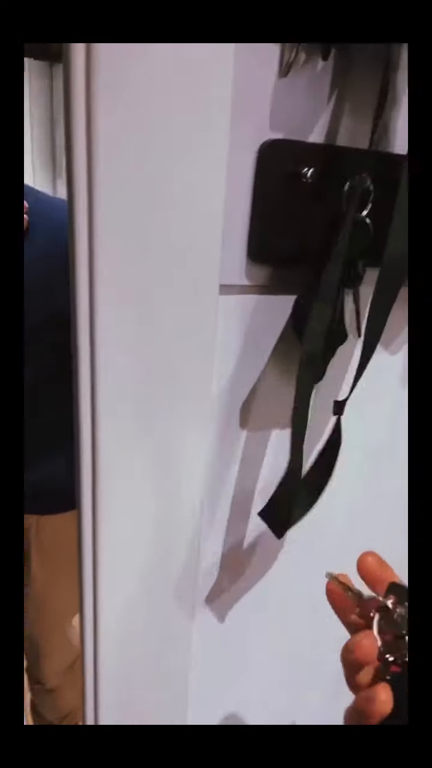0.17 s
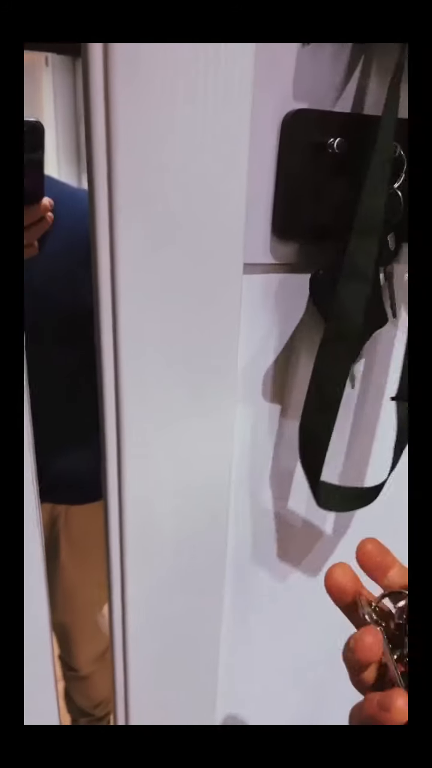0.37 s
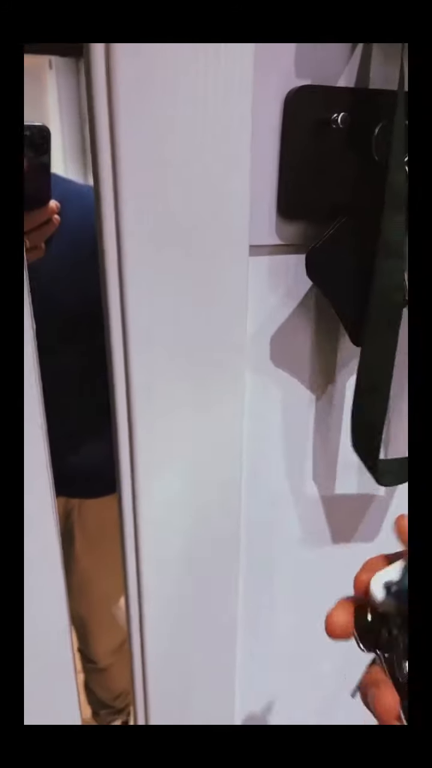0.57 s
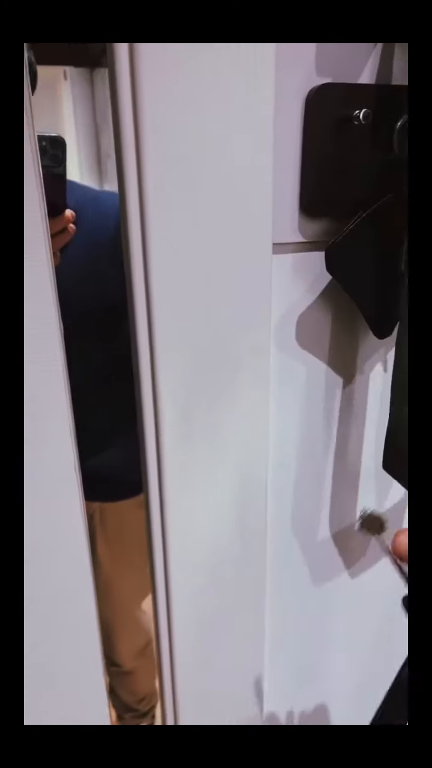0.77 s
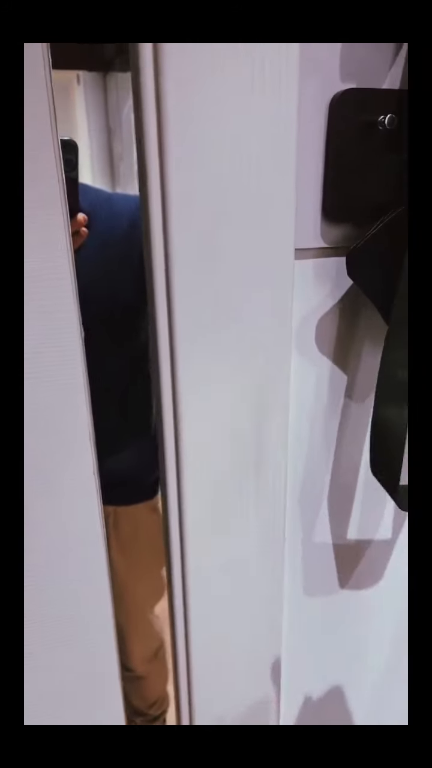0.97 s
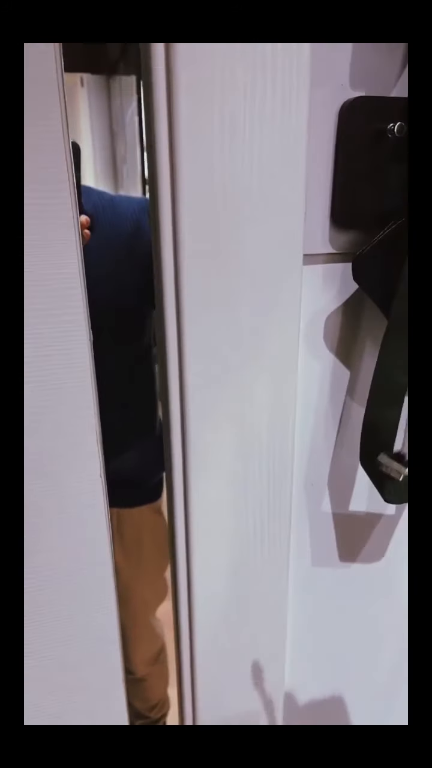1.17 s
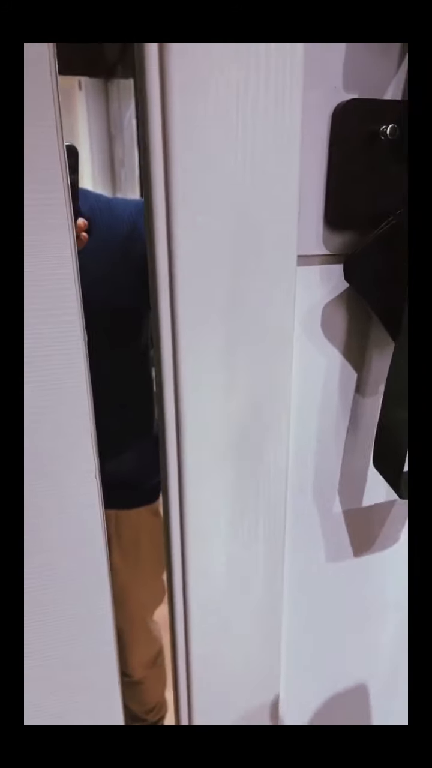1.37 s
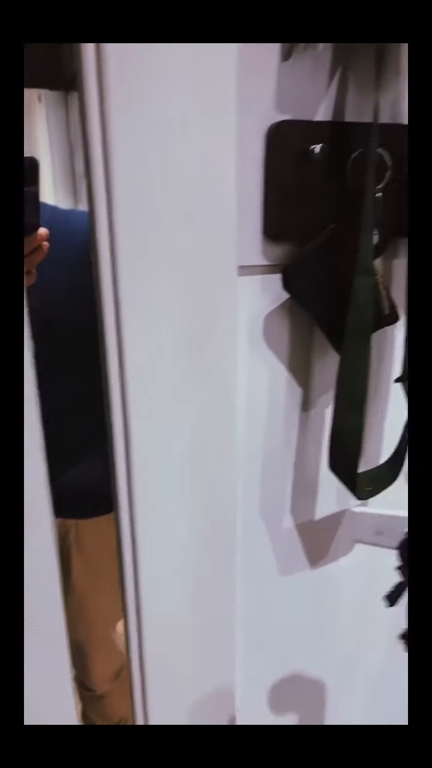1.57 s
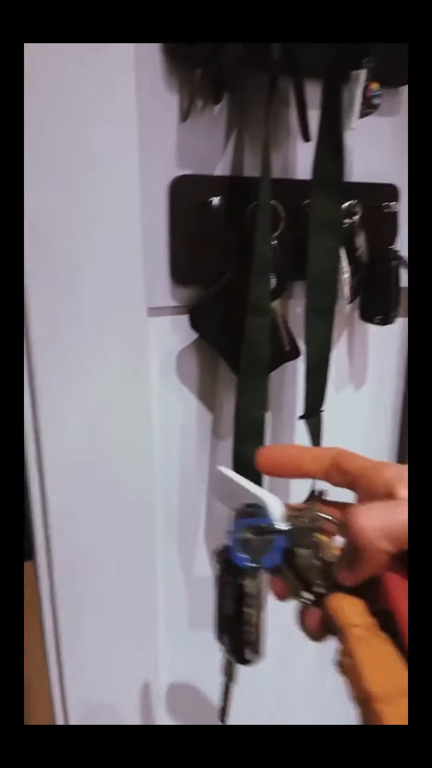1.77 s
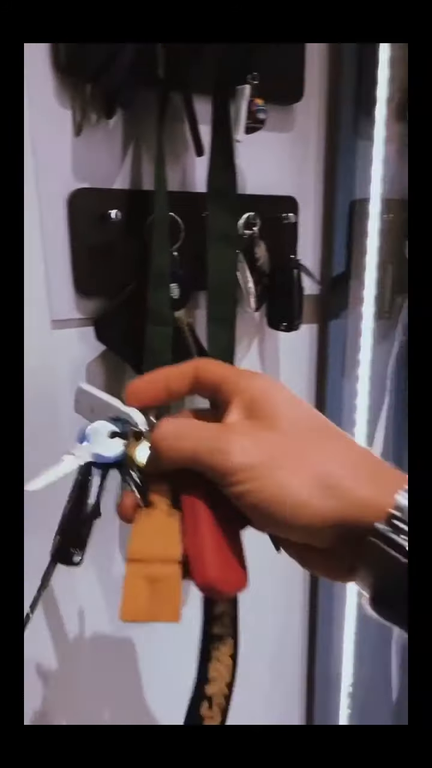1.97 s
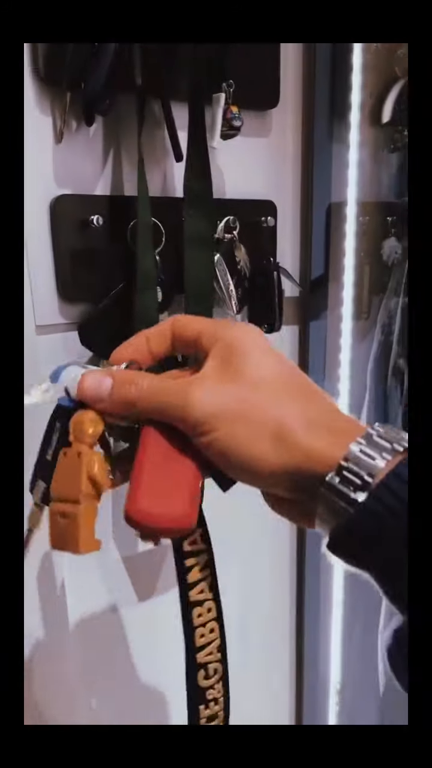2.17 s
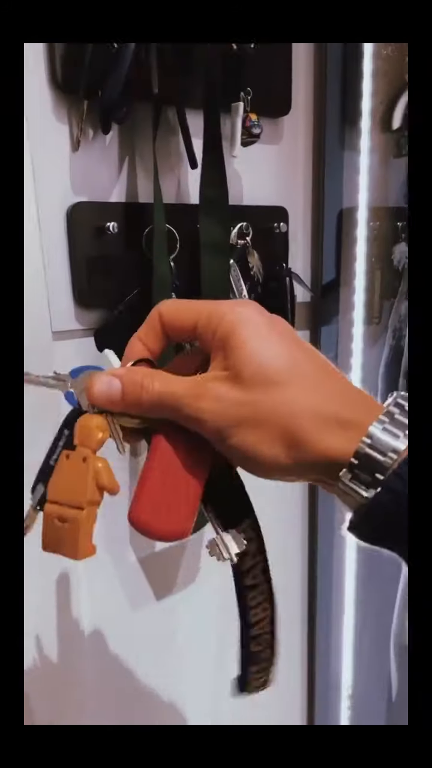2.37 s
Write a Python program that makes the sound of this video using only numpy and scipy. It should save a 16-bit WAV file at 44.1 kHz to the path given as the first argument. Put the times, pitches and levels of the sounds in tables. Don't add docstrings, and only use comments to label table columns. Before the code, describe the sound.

A bunch of keys and plastic fobs is handled close up, in dry, finger-muffled clacks and fine metallic rattle. Brisk clinks with short high rings come before 0.5 s, with sharper clacks near 0.7 and 0.84 s. From 1 to 1.7 s it is softer ticking. Wall knocks and faint low thuds join around 1.75-1.95 s, then the loudest clatter at 2.1-2.2 s and a last clack near 2.4 s. Quiet room air, faint hum, short echo.

```python
import sys
import numpy as np
from scipy import signal
from scipy.fft import rfft, irfft
from scipy.io import wavfile

SR = 44100
rng = np.random.default_rng(int(sys.argv[2]) if len(sys.argv) > 2 else 0)


def gain_from_db(level_db):
    decades = np.asarray(level_db, float) / 20
    return 10 ** decades


def persist_wave(psi):
    counts = np.round(np.clip(psi, -1, 1) * 32767).astype(np.int16)
    wavfile.write(sys.argv[1], SR, np.atleast_2d(counts).T)


N = 106016

# (time [s], level [dB])
HUM_SWELL = [
    (0, -76),
    (1.1, -62.5),
    (1.55, -60.5),
    (1.68, -54),
    (2.4, -56.5),
]
# (frequency [Hz], level per Hz [dB])
AIR_TONE = [(55, 4), (120, -7), (165, 0), (210, -11), (480, -12.5), (750, -17.5), (2300, -18),
            (4000, -28.5), (14000, -51)]
HUM_HZ, AIR_DB = 60, -62

# (time [s], rustle level [dB])
HANDLING = [(0, -48.5), (.17, -53), (.5, -57), (.6, -76), (.72, -59), (1.0, -68), (1.25, -67), (1.6, -64.5),
            (2.15, -54.5), (2.26, -60.5), (2.4, -55.5)]
# (frequency [Hz], level per Hz [dB])
BUNCH_TONE = [(710, -56), (1200, -13.5), (2290, -6), (3250, -10.5), (3720, -9), (4660, -12.5),
              (9570, -16.5), (14000, -17)]
RATTLE_S = 0.011
GRAINS_PER_S, GRAIN_SPREAD_DB = 10000, 2.4
GRAIN_CYCLES, SHIMMER_S = 30.0, .009

# the first four from one key, the last two from two other keys (frequency [Hz])
KEY_HZ = [6100, 10110, 10740, 13850, 11285, 13290]
# (time [s], level [dB], time to fall 60 dB [s])
KEY_HITS = [
    [(.335, -47.5, 0.71), (.45, -41.5, 0.45), (.482, -45, 0.027)],
    [(.335, -48, 0.75), (.482, -42, 0.088)],
    [(.45, -45, 0.27)],
    [(.285, -30, 0.14), (.445, -39, .2), (.482, -22.5, 0.027)],
    [(.001, -42, 0.2), (.436, -41, .15), (.924, -37.5, 0.073), (2.22, -48, .05)],
    [(.198, -42, 0.068), (.235, -41, 0.12), (1.938, -39, 0.24), (2.301, -46.5, 0.19)],
]
TAG_HZ = [6950, 7870, 10860, 12425, 2340, 8850]
# (time [s], level [dB], time to fall 60 dB [s])
TAG_HITS = [
    [(.595, -47.5, 0.094), (.567, -50, 0.058), (.925, -45, 0.072), (1.198, -34, 0.083), (1.613, -42, 0.17),
     (2.208, -44, 0.074)],
    [(.545, -45, .06), (.595, -51, 0.081)],
    [(0.546, -40, 0.078), (.595, -53, .06), (1.882, -58, 0.081)],
    [(.595, -57, 0.15), (1.198, -42, 0.15), (1.882, -39, 0.038)],
    [(.565, -35.5, 0.028), (.595, -42, 0.049)],
    [(2.169, -35.5, 0.082), (2.302, -32, 0.019)],
]
STRIKE_S, STOP_S = .0015, .05

# (time [s], peak level [dB], body pitch [Hz], brightness [dB], after-rattle level [dB])
CLACKS_LOW = [(.003,-37,2290,-5,-14.5),(.0448,-40,2380,0,-24),(.073,-32,2240,-6,-19),(.114,-34.5,4230,-3,-8.5),(.1379,-42,2700,4.5,-8),
              (.197,-45,3030,2,-17),(.2052,-27,2540,-11.5,-15.5),(.2314,-46.5,2120,9,-7),(.2854,-36,2520,1.5,-7),
              (.3296,-28.5,4270,-3,-9),(.3635,-41,1570,-2,-6),(.4229,-25,3210,-2.5,-11.5),(.4314,-27.5,2570,-3.5,-11.5),(.4818,-44,3370,4,-14),
              (.5232,-43.5,1520,-15,-2.5),(.5367,-44.5,2650,-6,-7),(.5457,-44,2340,1.5,-8.5),(.5516,-44.5,3850,-2,-8),(.5604,-41.5,2370,1,-8.5),
              (.6624,-44,2060,0,-6),(.672,-45,2190,-14,-16),(.6809,-23,1875,-5,-14.5),(.688,-31,1890,-18,-13),(.6958,-39,1880,-15,-18),
              (.72,-44,2680,4.5,-10),(.7625,-32.5,1700,-16,-9.5),(.7794,-40,2080,-17,-18),(.7963,-34,2280,-9,-12.5),(.839,-19.5,2340,-7,-15.5),
              (.8562,-34.5,1860,-10,-8),(.8752,-37.5,2300,3.5,-8),(.906,-45,1530,5,-9),(.9222,-36.5,1730,2.5,-9)]
# (time [s], peak level [dB], body pitch [Hz], brightness [dB], after-rattle level [dB])
CLACKS_TURN = [(.971,-44,2300,-8,-17),(.9906,-43.5,1790,-25,-25),(1.1109,-36.5,2300,-11,-12),
               (1.1185,-38.5,2130,-9,-11.5),(1.134,-58,2260,-22,-28),(1.153,-46,3000,2,-18),(1.158,-33,2350,-11.5,-10.5),(1.199,-34,2680,-6,-7.5),
               (1.2261,-35.5,2260,-6.5,-6.5),(1.2435,-32,2440,-18,-7.5),(1.253,-35,1990,-3,-8.5),(1.2888,-36,1930,-31,-8.5),(1.3066,-34.5,1520,-4.5,-11),
               (1.3295,-40,2260,-12,-16),(1.3722,-35.5,3600,-32,-10),(1.3888,-42.5,3500,5.5,-10),(1.3973,-36,2280,-32,-14),(1.4183,-39,2640,-0.5,-8.5),
               (1.4612,-40,2050,-7.5,-6),(1.4895,-37.5,2260,-1,-10),(1.507,-38.5,1960,-35,-8),(1.5233,-32.5,2720,-32,-11),(1.5357,-40,2300,-10,-10.5),
               (1.57,-45.5,2520,-5,-14),(1.6106,-37.5,1550,-5,-7.5),(1.6327,-41,1420,-9.5,-6.5),(1.6771,-38.5,1440,-14,-9),
               (1.692,-39,3900,-15,-17)]
# (time [s], peak level [dB], body pitch [Hz], brightness [dB], after-rattle level [dB])
CLACKS_RACK = [(1.7334,-40,3740,-2,-13.5),(1.7376,-39.5,1770,-5,-12),(1.7499,-30.5,1544,-26,-25),(1.7795,-42.5,2420,-5,-32),
               (1.795,-48,2400,-15,-33),(1.8168,-39.5,2530,-1.5,-20),(1.8287,-30,2310,-5.5,-27),(1.8499,-37,1690,-27,-10),(1.8634,-40,2080,-3.5,-8.5),
               (1.92,-32,2770,-9.5,-9.5),(1.9317,-31.5,3100,-8,-8),(1.937,-31.5,1650,-2,-8),(1.947,-31.5,1460,-13,-5),
               (1.955,-29,1455,-24,-12.5),(1.9654,-25.5,2960,-15,-11),(1.988,-26,2970,-8,-16.5),(2.0228,-27.5,1414,-28,-18),(2.0448,-32.5,2470,-4.5,-9.5),
               (2.062,-38,2300,-25,-7),(2.0867,-16,2934,-24,-13),(2.0994,-25.5,1446,-15,-9),(2.1274,-22,2320,-9.5,-8.5),(2.1345,-19,3800,-13,-10),
               (2.1454,-22,3630,-13,-6),(2.168,-17.5,2400,-13,-11.5),(2.1814,-20,2316,-20,-9.5),(2.2069,-30.5,2250,-7,-9),(2.24,-43,1510,-20,-17),
               (2.2862,-33.5,2400,-25,-18),(2.3012,-30.5,3800,-13,-8.5),(2.3161,-27.5,1624,-17,-8.5),(2.3451,-28,2320,-13.5,-6.5),(2.352,-38.5,2530,-3.5,-11),
               (2.386,-20.5,2950,-8.5,-10.5)]
BODY_CYCLES = 37
FOB_HZ, FOB_DB = 3630, -2
CONTACT_S, CRACK_S, GRIP_S = .0012, 0.0026, 0.0038

# (time [s], level [dB])
KNOCKS = [
    (0.894, -39),
    (1.758, -38.5),
    (1.7785, -40.5),
    (1.829, -37),
    (1.927, -37),
    (1.943, -34.5),
    (2.088, -27.5),
    (2.3165, -35.5),
]
KNOCK_HZ, KNOCK_S = 600, .0025
SNAP = 1.4

# (time [s], level [dB], pitch fall [Hz])
THUDS = [
    (1.066, -51, 111),
    (1.758, -50, 502),
    (1.777, -51, 500),
    (1.817, -46.5, 444),
    (1.831, -40.5, 172),
    (1.862, -43, 25),
    (1.924, -45, 403),
    (1.938, -45, 119),
    (1.962, -41, 25),
]
THUD_END_HZ, THUD_FALL_S = 59.4, 0.00592
THUD_RISE_S, THUD_DIE_S = .012, 0.013

HALL_T60_S, HALL_DB = 0.16, -19.5
CUTOFF_HZ = 14500


def rms_one(x):
    return x / np.sqrt(np.mean(x ** 2) + 1e-20)


def coloured(x, points):
    hz = np.fft.rfftfreq(len(x), 1 / SR) + 1
    point_hz, point_db = np.transpose(points)
    gain_db = np.interp(np.log(hz), np.log(point_hz), point_db)
    return irfft(rfft(x) * gain_from_db(gain_db), len(x))


def band(x, low_hz, high_hz, order=2):
    return signal.sosfilt(signal.butter(order, [low_hz, high_hz], "band", fs=SR, output="sos"), x)


def ring(clicks, hz, t60):
    shrink = gain_from_db(-60 / (t60 * SR))
    turn = 2 * np.pi * hz / SR
    return signal.lfilter([0, np.sin(turn)], [1, -2 * shrink * np.cos(turn), shrink * shrink], clicks + 1e-18)


def add(out, s, x):
    i = max(int(s * SR), 0)
    out[i:i + len(x)] += x[:len(out) - i]


def hum():
    t = np.arange(N) / SR
    s, db = np.transpose(HUM_SWELL)
    low_hum = np.sin(2 * np.pi * HUM_HZ * t)
    low_hum += 0.29 * rms_one(band(rng.standard_normal(N), 46.7, 72.6))
    air = coloured(rng.standard_normal(N), [(10, -43), (28, -16)] + list(AIR_TONE))
    return gain_from_db(np.interp(t, s, db)) * rms_one(low_hum) + gain_from_db(AIR_DB) * rms_one(air)


def rattle(rows):
    s, db = np.transpose(HANDLING)
    dull = gain_from_db(np.interp(np.arange(N) / SR, s, db))
    bright = dull * gain_from_db(4.0)
    t = np.arange(4000) / SR
    tail_shape = (1 - np.exp(-t / 0.00069)) * np.exp(-t / RATTLE_S)
    for at, peak_db, _, bright_db, after_db in rows:
        tail = gain_from_db(peak_db + after_db) * tail_shape
        add(dull, at, tail)
        add(bright, at, tail * gain_from_db(bright_db + 10))

    sizes = gain_from_db(GRAIN_SPREAD_DB * np.minimum(rng.exponential(1, N), 4)) * rng.choice([-1, 1], N)
    clicks = sizes * (rng.random(N) < GRAINS_PER_S / SR)
    pitches = np.geomspace(1200, 14000, 40)
    dealt = rng.integers(0, 40, N)
    out = np.zeros(N)
    for level, low_hz, high_hz in [(dull, 1150, 4600), (bright, 4600, 16000)]:
        rings = np.zeros(N)
        for k, hz in enumerate(pitches):
            if low_hz < hz < high_hz:
                own_clicks = level * clicks * (dealt == k)
                rings += ring(own_clicks, hz, GRAIN_CYCLES / hz + SHIMMER_S) * np.sqrt(hz / 4000)
        rustle = level * rng.standard_normal(N)
        out += band(0.37 * rings + 0.42 * rustle, low_hz, high_hz, order=3)
    shove = band(dull ** 2 * clicks, 260, 740)
    return coloured(out, BUNCH_TONE) * gain_from_db(6) + gain_from_db(24.5) * shove


def sing(modes_hz, hits):
    out, t = np.zeros(N), np.arange(4000) / SR
    strike = 1 - np.exp(-t / STRIKE_S)
    finger = np.clip((STOP_S - t) / 0.0029, 0, 1)
    for hz, strikes in zip(modes_hz, hits):
        for s, db, t60 in strikes:
            swing_hz, phase = rng.uniform(30, 80), rng.uniform(0, 2 * np.pi)
            waver = 1 + .4 * np.sin(2 * np.pi * swing_hz * t + phase)
            shape = strike * gain_from_db(-60 * t / t60) * finger * waver
            add(out, s, gain_from_db(db) * shape * np.sin(2 * np.pi * hz * t))
    return out


def clacks(rows):
    out, t = np.zeros(N), np.arange(1500) / SR
    grip = 0.17 + 0.76 * np.exp(-(t / GRIP_S) ** 2)
    swell = (1 - np.exp(-(t / CONTACT_S) ** 2)) * grip
    fob_decay = gain_from_db(-60 * t * FOB_HZ / BODY_CYCLES / 0.87)
    noises = rng.standard_normal((len(rows), 2, 1500))
    for (s, db, hz, bright_db, _), (rough, hiss) in zip(rows, noises):
        body = np.sin(2 * np.pi * hz * t) * gain_from_db(-60 * t * hz / BODY_CYCLES)
        fob = np.sin(2 * np.pi * FOB_HZ * t + rough[0]) * fob_decay
        body += gain_from_db(FOB_DB + 0.41 * (db + 26.0)) * fob
        crack = band(hiss, 2800, 9100) * np.exp(-t / CRACK_S)
        clack = body * (1 + 0.25 * rough) + gain_from_db(bright_db + 4) * crack
        add(out, s, gain_from_db(db + 4.5) * swell * clack)
    return band(out, 780, 22000)


def knocks():
    out, t = np.zeros(N), np.arange(1500) / SR
    for (s, db), noise in zip(KNOCKS, rng.standard_normal((len(KNOCKS), 1500))):
        knock = band(noise * np.exp(-t / KNOCK_S), KNOCK_HZ / 2, KNOCK_HZ * 2, order=1)
        knock[0] += SNAP * np.abs(knock).max()
        add(out, s, gain_from_db(db) * knock / np.abs(knock).max())
    return out


def thuds():
    out, t = np.zeros(N), np.arange(6000) / SR
    shape = (0.34 + t / THUD_RISE_S) * np.exp(-t / THUD_DIE_S) * 2
    for s, db, fall_hz in THUDS:
        hz = THUD_END_HZ + fall_hz * np.exp(-t / THUD_FALL_S)
        add(out, s, gain_from_db(db) * np.sin(2 * np.pi * np.cumsum(hz) / SR) * shape)
    return out


def hall(x):
    t = np.arange(int(.4 * SR)) / SR
    tail = band(rng.standard_normal(len(t)), 140, 7700, order=1)
    tail *= gain_from_db(-60 * t / HALL_T60_S) * (t > .004)
    return gain_from_db(HALL_DB) * signal.fftconvolve(x, tail / np.sqrt(np.sum(tail ** 2)))[:N]


def scene():
    rows = list(CLACKS_LOW) + list(CLACKS_TURN) + list(CLACKS_RACK)
    keys = rattle(rows) + sing(KEY_HZ, KEY_HITS) + sing(TAG_HZ, TAG_HITS) + clacks(rows)
    return (hum() + keys + hall(keys) + knocks() + thuds())[None]


def band_limit(x):
    return signal.sosfilt(signal.butter(12, 15300, fs=SR, output="sos"), x)


def record(dry):
    mix = signal.sosfilt(signal.cheby2(12, 45, CUTOFF_HZ, fs=SR, output="sos"), dry)
    return band_limit(mix)


dry = scene()
out = record(dry)
persist_wave(out)
```